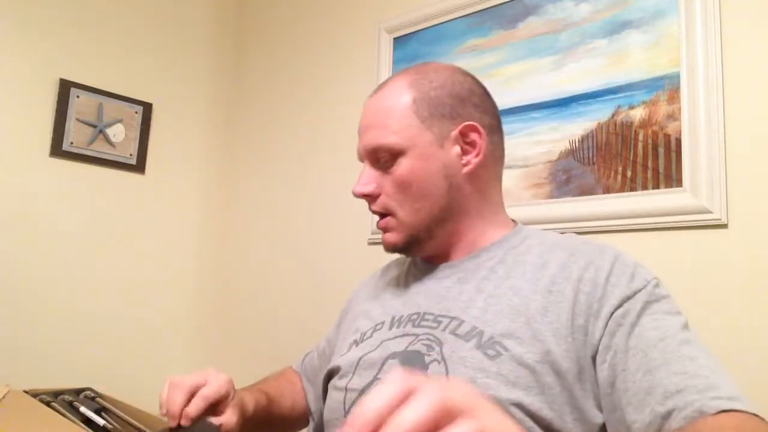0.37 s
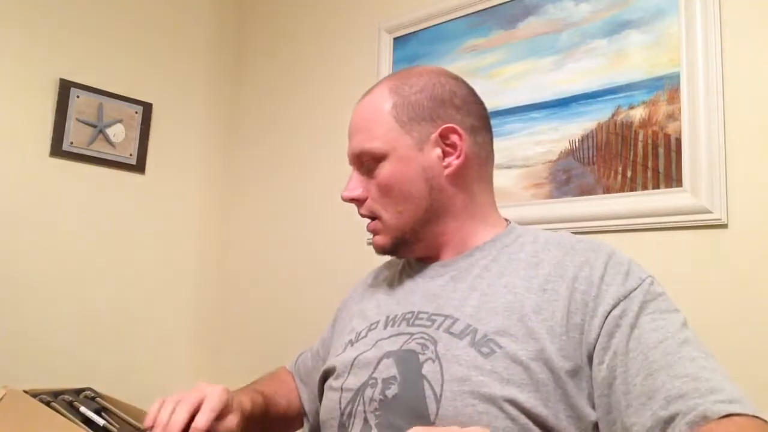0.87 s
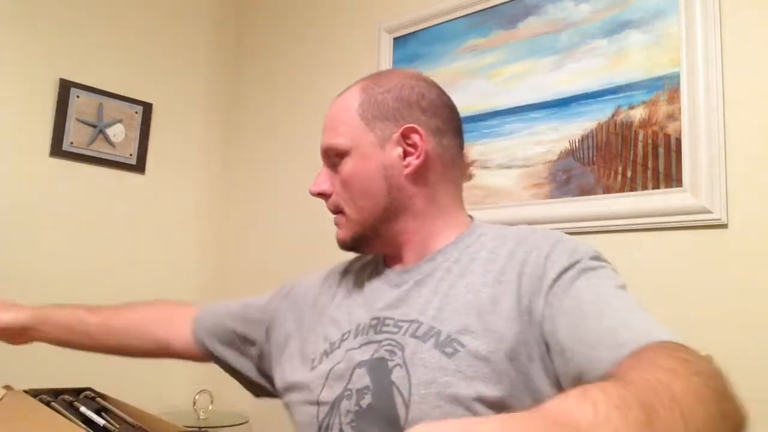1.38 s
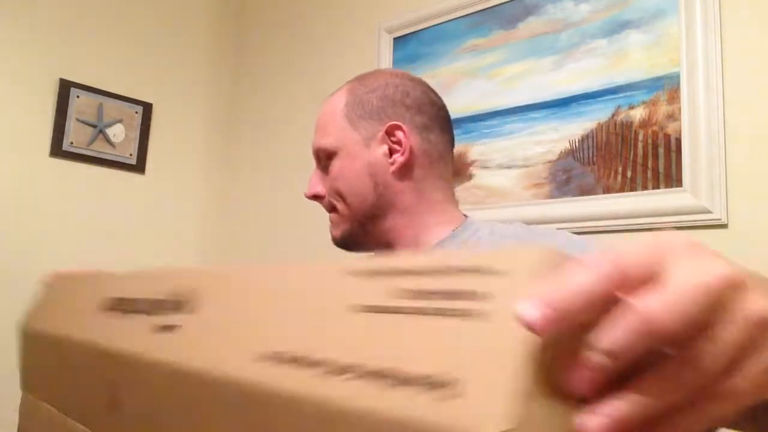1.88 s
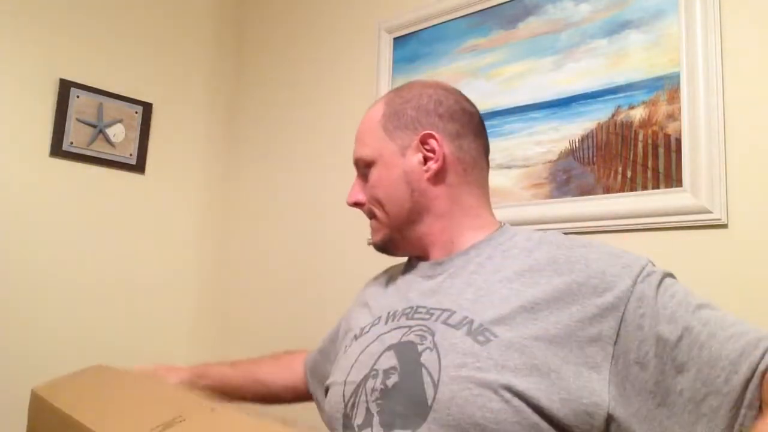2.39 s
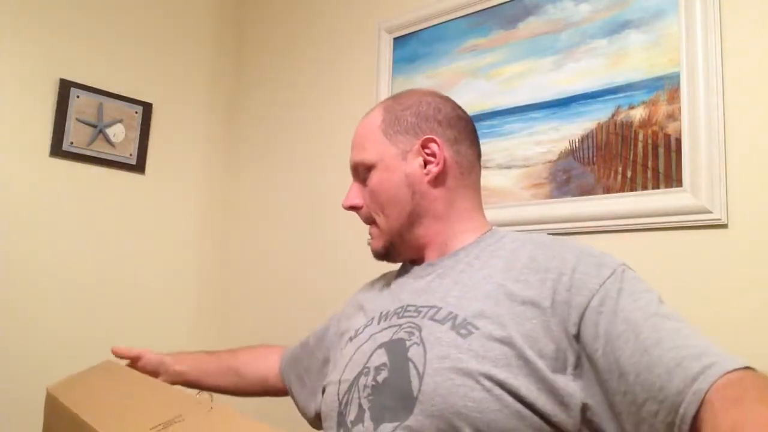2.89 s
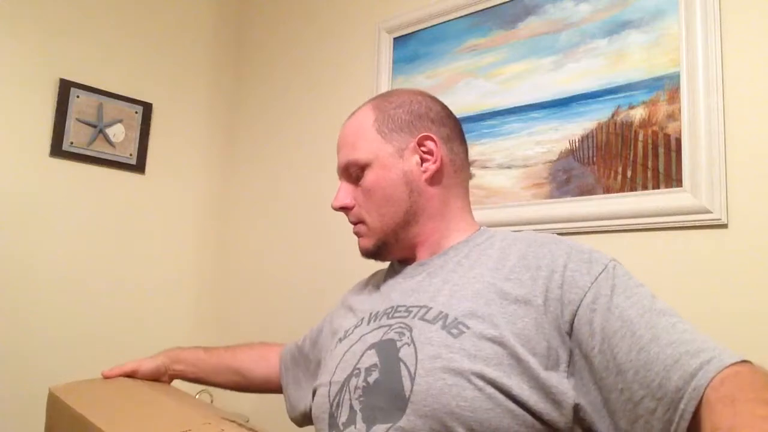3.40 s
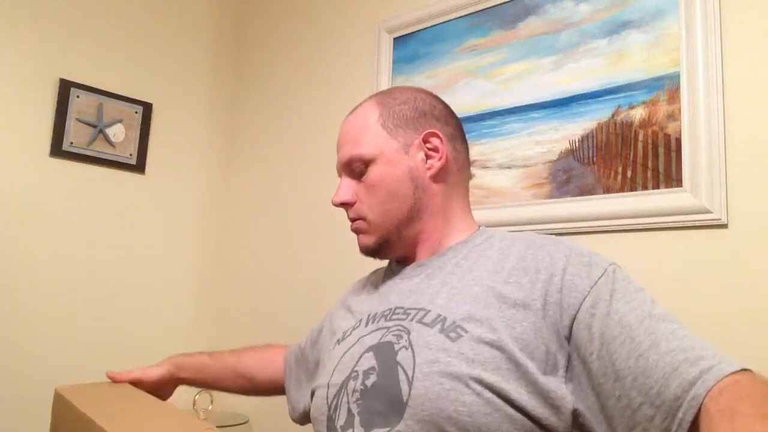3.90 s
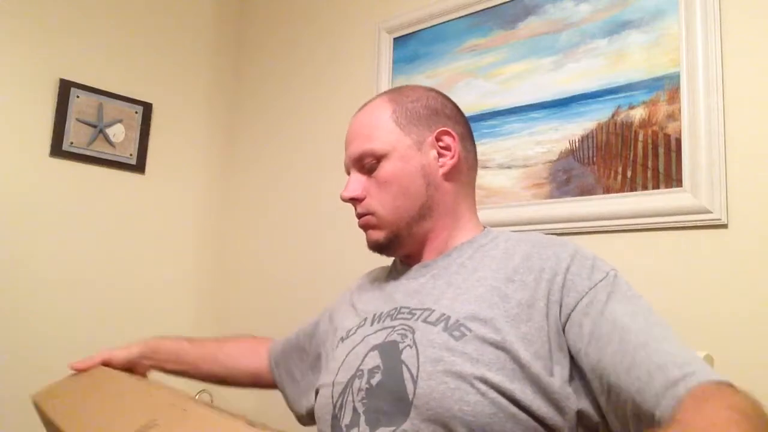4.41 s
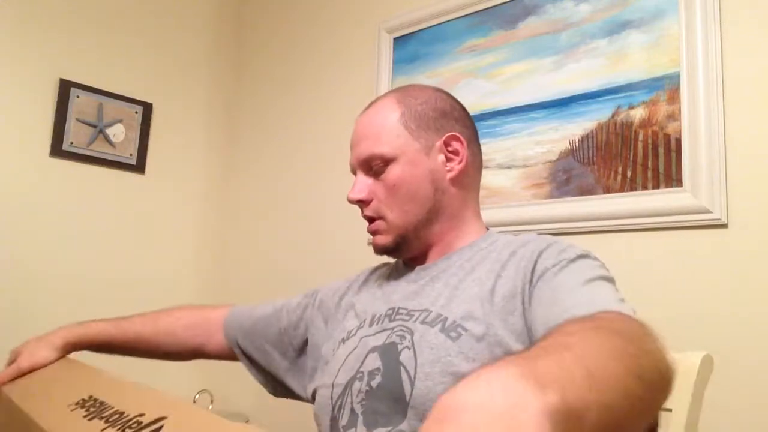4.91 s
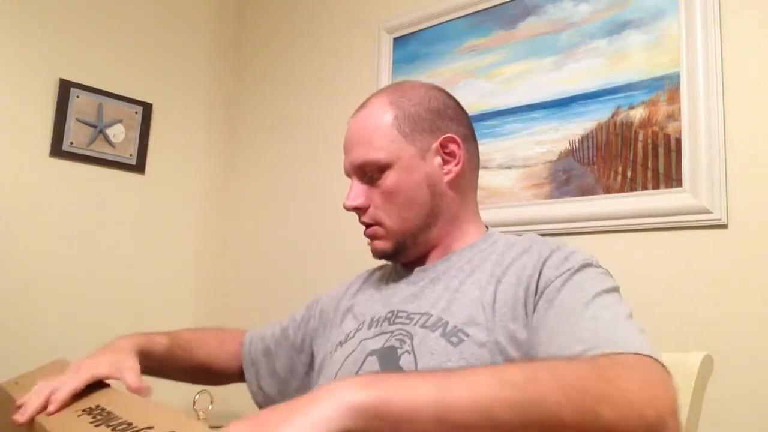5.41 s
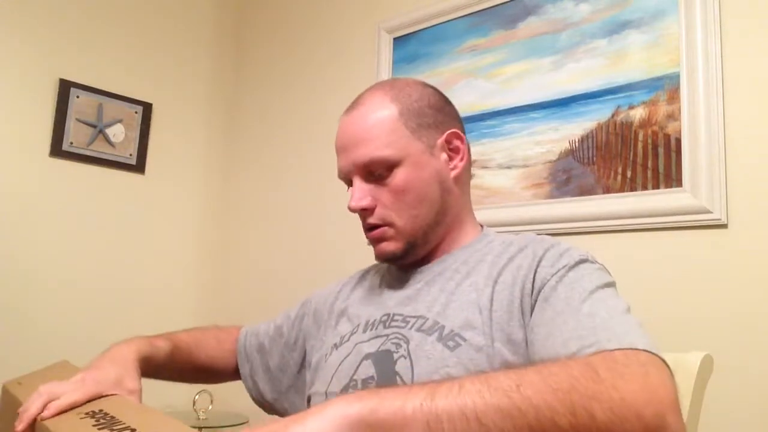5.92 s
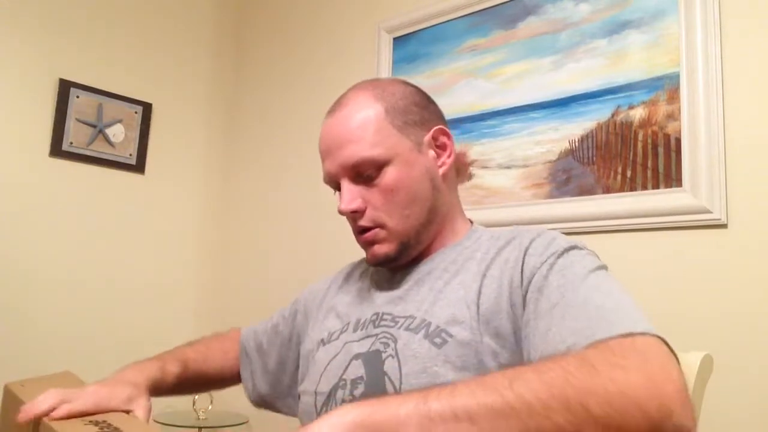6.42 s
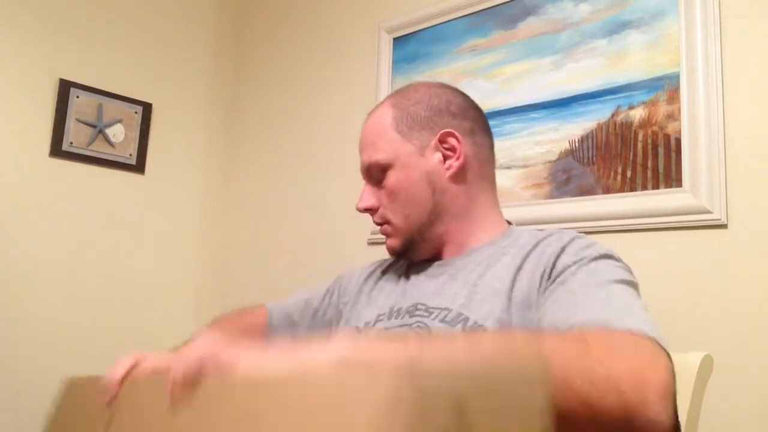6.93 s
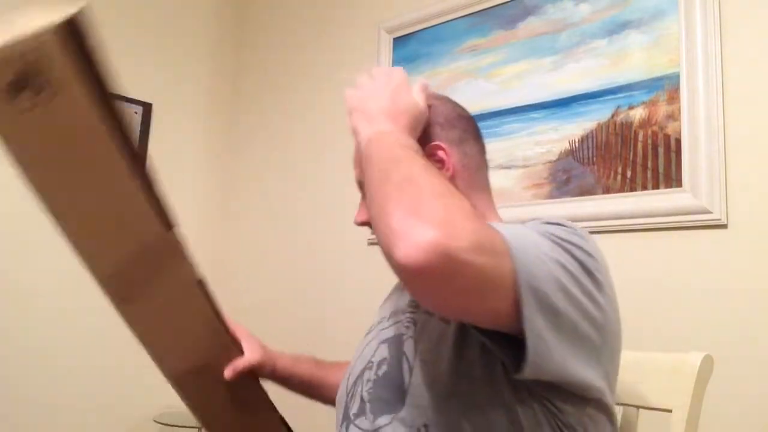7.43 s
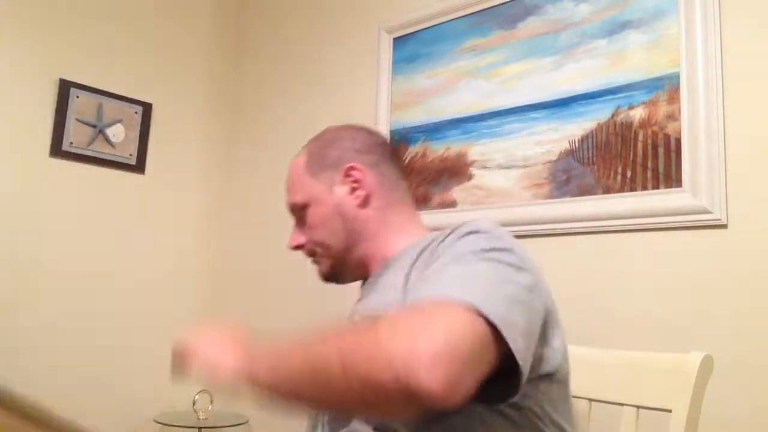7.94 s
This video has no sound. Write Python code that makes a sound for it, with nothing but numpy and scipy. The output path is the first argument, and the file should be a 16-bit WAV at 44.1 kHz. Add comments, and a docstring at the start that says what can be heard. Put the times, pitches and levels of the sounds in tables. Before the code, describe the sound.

A quiet furnished room with low, soft room tone; a long cardboard box is moved on a wooden table close to the microphone. For the first second only very faint rubbing, then a small tap and rasp at 1.0 s and a cluster of little clicks around 1.65 s. From 1.8 s dry papery sliding comes in strokes, with a short flap rasp and tiny squeak near 2.5 s. At 3.5 s a sharp, cracking hollow knock, then a crisp scrape at 3.85 s. Between 4.5 and 4.8 s low wavering creaks with light bumps; at 5.0 s a strong, duller boxy thud. Sliding continues, small bumps gather near 5.9 s, and at 6.3-6.5 s comes the loudest harsh, bright rasp with a knock. Then quieter: a brushing scrape at 7.25 s, light hollow taps from 7.4 to 7.95 s, fading to near stillness by 8 s.

```python
"""A long cardboard box is lifted, set down and pushed about on a wooden table in a quiet furnished room.
Sliding is random friction grit that hisses on the paper, scrapes the flutes (the wavy inner layer of the
cardboard) and shakes the panels and the table. Flaps jerk free in short rasps of the same kind of grit.
Knocks are clicks that ring panels and table and crack like snapping fibres. Now and then an edge sticks
and slips fast enough to creak, as wavering tones. Fading noise gives the echo, steady noise the room tone."""
import sys
import numpy as np
from scipy import signal
from scipy.fft import rfft, irfft
from scipy.io import wavfile

SR = 44100
rng = np.random.default_rng(int(sys.argv[2]) if len(sys.argv) > 2 else 0)


def nominal_scale(level):
    """Amplitude ratio for a level in decibels (scalar or array-like)."""
    x = np.asarray(level, float) / 20
    return 10 ** x


def wav_record(signal):
    """Record a signal, one row per channel, as 16-bit PCM in the file named by sys.argv[1]."""
    frames = np.transpose(np.atleast_2d(signal))
    bounded = np.clip(frames, -1, 1)
    # unit amplitude maps onto the largest positive 16-bit level
    quanta = np.round(bounded * 32767).astype(np.int16)
    wavfile.write(sys.argv[1], SR, quanta)


N = 356134

# ringing modes of the box panels: f/Hz, relative level/dB, time to die by 60 dB/s
PANEL_MODES = [(157, -13, 0.2), (203, -2, 0.16), (247.5, 0, 0.084), (300.8, 2.5, 0.053), (364.6, -2, 0.055),
               (407.2, 0, 0.057), (473.3, 2, 0.048), (545, 4, 0.031), (652, 3, 0.03), (746, 4.5, 0.02),
               (920, 4, 0.0085), (1031, -4, 0.042), (1234, 0, 0.015), (1435, 1, 0.013), (1660, 9.5, 0.0028),
               (1950, -4.5, 0.0055)]
# ringing modes of the table top: f/Hz, relative level/dB, time to die by 60 dB/s
TABLE_MODES = [(61, -5.5, 0.19), (84.4, 0.5, 0.17), (101.7, 2.5, 0.18), (151, -3, 0.22)]


def sliding():
    """Friction grit drives the paper, the flutes, the panels and the table."""
    # rubbing strokes: t/s of the fastest moment, rise/s, fall/s, paper hiss level/dB, lightness of touch/dB
    strokes = [(.3, 0.13, .15, -75.5, 0), (.58, 0.16, 0.27, -69.5, -1), (.76, 0.076, 0.093, -73, -8),
               (1.69, 0.11, .12, -60, -8), (1.848, 0.099, .09, -52.5, 2), (1.96, 0.14, 0.25, -62.5, -6.5),
               (2.12, 0.14, 0.5, -61, -11), (2.3, 0.17, 0.37, -53, 6), (2.589, 0.26, 0.066, -55, 7),
               (2.72, 0.42, 0.32, -58, 9), (2.86, 0.11, 0.28, -58, 5.5), (3.09, 0.16, 0.16, -49, 8),
               (3.16, 0.14, 0.24, -52, 7), (3.31, 0.077, 0.1, -48, 6), (3.46, 0.063, 0.28, -57, 3),
               (3.67, 0.12, 0.18, -56.5, 6.5), (3.93, 0.38, 0.2, -52.5, -6.5),
               (4.02, 0.087, 0.075, -47.5, -3), (4.16, 0.17, 0.093, -55.5, 4.5),
               (4.349, 0.17, 0.2, -55.5, 5), (4.42, 0.12, 0.45, -66.5, 4.5), (4.601, 0.34, 0.9, -63, -3.5),
               (4.97, 0.15, 0.18, -48.5, 4), (5.24, 0.24, 0.41, -54, 8.5), (5.378, 0.23, 0.32, -45.5, 5),
               (5.48, 0.6, 0.15, -52.5, 10), (5.71, 0.064, 0.22, -63.5, 0), (5.9, 0.044, .15, -66, -9),
               (5.929, 0.11, 0.1, -52, -5), (6.079, 0.14, 0.069, -58.5, -4), (6.2, 0.28, 0.33, -58.5, 4),
               (6.3, 0.18, .1, -50.5, -16), (6.369, 0.037, 0.28, -35.5, -6), (6.439, .05, .08, -35.5, -8.5),
               (6.52, 0.12, 0.22, -45, -7.5), (6.681, 0.44, 0.23, -52.5, 6), (6.8, 0.085, 0.11, -49, 6),
               (6.92, 0.11, 0.27, -64.5, -4.5), (7.25, 0.065, .07, -42.5, 7.5),
               (7.53, 0.36, 0.98, -72, -4.5)]
    # the hands' load on the box: t/s, panel shake level/dB, f/Hz of the rubbed spot
    load = [(0.0, -76.5, 346), (0.43, -71, 316), (0.61, -65, 487), (0.97, -73, 302), (1.01, -62, 550),
            (1.46, -83, 287), (1.91, -68.5, 298), (1.95, -58.5, 463), (2.51, -54.5, 254),
            (2.58, -52.5, 400), (2.94, -56, 297), (3.17, -53, 440), (3.53, -57, 310), (3.6, -46.5, 420),
            (3.71, -52.5, 325.4), (4.09, -60, 323), (4.2, -56.5, 445), (4.34, -57.5, 267),
            (4.61, -47.5, 420), (4.67, -42.5, 340), (4.76, -51, 600), (4.83, -58, 372), (5.1, -44.5, 286),
            (5.3, -61, 337), (5.35, -44.5, 540), (5.46, -59.5, 314), (5.87, -63, 347), (5.91, -55, 480),
            (5.97, -58, 396), (6.01, -60.5, 353), (6.14, -53.5, 373), (6.24, -51, 428), (6.33, -35.5, 507),
            (6.41, -32, 690), (6.49, -57, 340), (6.94, -60.5, 395), (7.6, -60, 302), (7.64, -64, 474),
            (8.07, -64, 358)]
    resting_hiss_db, light_spares = -81.5, 0.3   # a light touch spares the flutes this share of its dB
    *stroke, db, light_db = np.transpose(strokes)
    hiss_db = swells(*stroke, db, resting_hiss_db)
    top_db = swells(*stroke, db + light_db, resting_hiss_db)
    press_db = swells(*stroke, db - light_spares * light_db, resting_hiss_db)
    panel_db, spot_hz = in_time(load)
    box = paper_hiss(hiss_db, top_db) + flute_scrape(press_db, panel_db)
    return box + panel_shake(panel_db, spot_hz) + table_rumble(panel_db)


def paper_hiss(hiss_db, top_db, split_hz=8000):
    """Fine grit rubs the paper face; a lighter touch gives more of the highest treble."""
    # colour of rubbed paper: f/Hz, relative level per Hz/dB
    hiss_colour = [(1470, -19.5), (2500, -7), (2960, -5.5), (4200, -5.5), (7680, -9), (11700, -15),
                   (14600, -14.5), (15500, -15.5)]
    hiss = coloured(grit(15000, spread_db=2.5, lumpy_db=1.6), hiss_colour)
    top = filtered(hiss, 2, split_hz, "high")
    return nominal_scale(hiss_db) * (hiss - top) + nominal_scale(top_db) * top


def flute_scrape(press_db, panel_db):
    """Flutes sound by speed times load, and higher the harder they are scraped."""
    scrape_db, growth, flute_hz, db_per_octave = -57, 1.04, 1250, 38
    growth_db = growth * ((press_db + panel_db) / 2 - scrape_db)
    spot_hz = flute_hz * 2 ** (growth_db / db_per_octave)
    scrape = rubbed(grit(2500, spread_db=2.0, lumpy_db=0.0), flute_modes(), spot_hz, 0.8)
    return nominal_scale(scrape_db + growth_db) * scrape


def flute_modes():
    """The broad resonances of the flutes as quickly dying modes: a wider one dies sooner."""
    # resonances of the flutes: f/Hz, width/Hz, relative level/dB
    flutes = [(892, 870, 18), (1250, 533, 13), (1570, 195, 4), (1904, 390, 6), (2460, 580, 5)]
    return [(hz, db, np.log(1000) / (np.pi * width)) for hz, width, db in flutes]


def panel_shake(panel_db, spot_hz):
    """Lumpy grit shakes the panels, most near the pitch of the rubbed spot."""
    force = grit(1500, spread_db=3.5, lumpy_db=3.0)
    return nominal_scale(panel_db) * rubbed(force, PANEL_MODES[:12], spot_hz, 0.7)


def table_rumble(panel_db):
    """Sparse grit rumbles in the table top as the box leans on it and the hands load it."""
    # leans: t/s, rise/s, fall/s, rumble level/dB
    leans = [(.36, 0.26, 0.43, -67), (1.08, 0.2, 0.16, -52), (1.73, 0.2, 0.15, -52), (2.2, 0.12, 0.37, -59),
             (2.6, 0.27, 0.35, -64), (3.12, 0.077, 0.11, -56), (3.31, 0.076, 0.12, -58.5),
             (3.7, 0.31, 0.048, -51), (4.01, 0.13, 0.16, -50.5), (4.32, 0.11, 0.09, -49.5),
             (4.75, .15, 0.22, -57), (5.08, 0.14, 0.25, -45), (5.44, 0.087, 0.059, -49),
             (6.12, 0.32, 0.51, -50), (6.99, 1, 0.18, -68), (7.551, 0.23, 0.57, -66)]
    under_load_db = -23.5   # rumble relative to the panel shake
    weight = nominal_scale(swells(*np.transpose(leans), -90)) + nominal_scale(panel_db + under_load_db)
    return weight * rms_one(body(grit(450, spread_db=3.5, lumpy_db=4.0), TABLE_MODES))


def rasps():
    """A flap drags hard for a moment: quick rise, slower fall."""
    # flaps jerking free: start t/s, length scale/s, flute f/Hz, relative scrape level/dB, relative hiss level/dB
    jerks = [(1.02, 0.043, 2254, -54.5, -63), (1.55, .018, 2300, -87, -67.5),
             (1.655, 0.012, 2460, -57, -50), (1.7, 0.0098, 2300, -53.5, -67),
             (2.225, 0.055, 1570, -48, -84), (2.526, 0.062, 1500, -47, -50.5),
             (2.68, 0.024, 1600, -53.5, -63), (2.955, .012, 2300, -78, -47.5),
             (3.074, 0.032, 1800, -51, -47), (3.856, 0.043, 1210, -37, -33.5),
             (4.742, 0.031, 2266, -64, -55), (5.33, 0.1, 1900, -54, -65), (5.888, 0.026, 1200, -45, -62.5),
             (6.04, 0.027, 1570, -53.5, -64), (6.24, 0.22, 1900, -46.5, -66.5),
             (6.32, 0.18, 1950, -35, -35), (6.42, 0.027, 1950, -26, -18.5),
             (7.135, 0.052, 1250, -59, -65.5), (7.229, 0.057, 1500, -45.5, -45.5),
             (7.305, 0.029, 1570, -51.5, -49)]
    # hiss of a flap dragged hard: f/Hz, relative level per Hz/dB
    drag_colour = [(1470, -23), (2500, -8.5), (2760, -12), (3890, -12.5), (4470, -8.5), (6250, -4),
                   (9510, -13.5), (15500, -17.5)]
    shake_db = -6   # panels relative to the scrape
    t = np.arange(N) / SR
    swell = np.zeros((2, N))
    flute_hz = np.full(N, jerks[0][2], float)
    for s, length, hz, *levels_db in jerks:
        span = slice(int(s * SR), int((s + 3 * length) * SR))
        phase = np.abs(t[span] - s) / length * 3.3
        swell[:, span] += nominal_scale(levels_db)[:, None] * (phase * np.exp(1 - phase)) ** 1.34
        flute_hz[span] = hz
    force = grit(7000, spread_db=2.5, lumpy_db=2)
    scrape = rubbed(force, flute_modes(), flute_hz, 0.3)
    shake = nominal_scale(shake_db) * rms_one(body(force, PANEL_MODES[5:10]))
    return swell[0] * (scrape + shake) + swell[1] * coloured(force, drag_colour)


def knocks():
    """A blow rings the panels, cracks and thumps the table; returns the near sound and the feed to the echo."""
    # corner and hand knocks: t/s, relative panel level/dB, f/Hz of the struck spot,
    # relative crack level/dB, relative table thump level/dB
    blows = [(1.027, -38, 545, -61, -58), (1.037, -37, 600, -45.5, -56), (1.642, -66, 900, -41.5, -64),
             (1.648, -52, 151, -41, -49), (1.664, -61, 152, -37.5, -44), (1.686, -37, 251, -50, -50),
             (1.751, -50.5, 620, -50, -55), (2.467, -44, 250, -73, -77), (3.079, -45.5, 244, -44, -72),
             (3.491, -40, 278, -25, -65), (3.499, -33.5, 284, -34, -74), (3.528, -14.5, 278, -19, -35.5),
             (3.53, -31.5, 1070, -21, -62), (3.748, -43.5, 756, -47, -77), (3.858, -25.5, 266, -31, -70),
             (4.238, -49, 415, -45.5, -72), (4.313, -35, 256, -49, -69), (4.468, -33.5, 255, -61, -52),
             (4.522, -31.5, 366, -47, -43), (4.678, -35, 806, -71, -43.5), (4.711, -33.5, 590, -55, -60),
             (4.835, -34.5, 335, -66, -51), (5.009, -10.5, 310, -34.5, -55), (5.048, -33, 900, -68, -55),
             (5.024, -18, 303, -44, -29.5), (5.862, -42, 182, -80, -45.5), (5.896, -42, 448, -51, -61.5),
             (5.918, -34, 395, -67, -58), (5.928, -42, 446, -68, -66.5), (5.954, -38, 404, -62, -48.5),
             (5.968, -44.5, 302, -71.5, -60), (6.038, -35.5, 300, -54, -54),
             (6.073, -43.5, 263, -60.5, -59), (6.428, -22, 700, -42.5, -39), (6.443, -19, 309, -28, -34),
             (6.897, -53, 900, -52, -82), (7.047, -51.5, 800, -59.5, -79), (7.368, -45.5, 417, -57, -83),
             (7.471, -63, 407, -59, -68), (7.498, -54, 203.4, -58, -75), (7.546, -42, 293, -75, -75),
             (7.566, -56, 300, -64, -81), (7.676, -34, 1250, -48, -79), (7.677, -30.5, 510, -69, -74),
             (7.682, -34, 397, -70, -70), (7.769, -29.5, 527, -61, -55), (7.775, -36, 420, -64, -83),
             (7.893, -52, 450, -59.5, -68), (7.937, -46, 383, -62, -68)]
    # colour of the cracks: f/Hz, relative level per Hz/dB
    snap_colour = [(880, -43.5), (1500, -5.5), (2700, -8), (4230, -4), (6070, -7.5), (7670, -9),
                   (15500, -20)]
    # panel and table ringing goes into the echo more weakly, the snaps more strongly
    echo_ring_db, echo_snap_db = -5, 3
    s, panel_db, spot_hz, crack_db, thump_db = np.transpose(blows)
    at = (s * SR).astype(int)
    ringing = struck_panels(at, panel_db, spot_hz, crack_db) + table_thump(at, thump_db)
    snaps = clicks_at(at, nominal_scale(crack_db + 13.0))
    near = ringing + coloured(crack(snaps), snap_colour)
    # the echo is fed the plain coloured click of each crack, without the crumpling noise
    to_echo = nominal_scale(echo_ring_db) * ringing + nominal_scale(echo_snap_db) * coloured(snaps, snap_colour)
    return near, to_echo


def struck_panels(at, panel_db, spot_hz, crack_db, baffle_hz=130, give_cycles=6.4):
    """A blow rings the low modes near the struck spot's pitch; a hard one also the upper modes."""
    # upper modes lie between panel and crack, more for a high spot
    upper_db, hardness_share, high_spot_db_per_octave = -7.5, 0.33, 7.5
    upper_db = panel_db + upper_db + hardness_share * (crack_db - panel_db)
    upper_db += high_spot_db_per_octave * np.log2(spot_hz / PANEL_MODES[3][0])
    uneven_db = 2.0 * rng.standard_normal((len(at), len(PANEL_MODES)))
    out = np.zeros(N)
    for k, (hz, db, t60) in enumerate(PANEL_MODES):
        height = nominal_scale(db + uneven_db[:, k])
        low = clicks_at(at, nominal_scale(panel_db - 1) * nearness(hz, spot_hz, 0.42) * height)
        upper = clicks_at(at, (k > 6) * (-1) ** k * nominal_scale(upper_db) * height)
        # the soft wall gives way over a few cycles, so the low ring swells before it dies
        give = ring(low, hz, give_cycles / hz) * 2 * np.log(1000) * hz / (give_cycles * SR)
        sharp = filtered(upper + 1e-18, 1, hz / 2, "high")   # a hard edge has no low push
        out += ring(give + sharp, hz, t60)
    return filtered(out, 2, baffle_hz, "high")   # thin panels radiate no deep bass


def crack(snaps, crumple_s=0.0025, settle_s=0.038, settle_db=-26):
    """A snap, then noise of crumpling fibres, then fainter noise as the flaps rustle and settle."""
    fading = signal.lfilter([1], [1, -np.exp(-1 / (crumple_s * SR))], snaps)
    fading += nominal_scale(settle_db) * signal.lfilter([1], [1, -np.exp(-1 / (settle_s * SR))], snaps)
    return snaps + nominal_scale(-13) * fading * rng.standard_normal(N)


def table_thump(at, thump_db, push_hz=250):
    """The heavy table top gets only a soft push, which rings its modes."""
    push = filtered(clicks_at(at, nominal_scale(thump_db + 0.5)) + 1e-18, 2, push_hz, "low")
    return body(push, TABLE_MODES)


def creak(rasp_hz=2600):
    """An edge sticks and slips at a wavering rate: a tone with overtones, and a puff of noise per slip."""
    # one list for each creak: t/s, slip rate f/Hz, level/dB before the wavering
    slips = [
        [(2.527, 1480, -56), (2.535, 1670, -44), (2.552, 1330, -60), (2.57, 1630, -62), (2.71, 1600, -66.5)],
        [(3.775, 2500, -79.5), (3.785, 5400, -66), (3.797, 6200, -72)],
        [(4.52, 380, -41), (4.54, 470, -39), (4.555, 456, -37.5), (4.572, 304, -33.5), (4.603, 487, -32),
         (4.625, 420, -32.5), (4.645, 340, -42), (4.67, 780, -66)],
        [(4.685, 240, -43), (4.71, 290, -32.5), (4.713, 570, -36.5), (4.735, 620, -38.5), (4.752, 580, -40),
         (4.77, 680, -55)],
        [(4.762, 1260, -52), (4.785, 1255, -53), (4.835, 1330, -63)],
    ]
    # colour of each creak: fall of the overtones/dB, favoured f/Hz, its lift/dB, unevenness of grip/dB
    colours = [(-11, 3000, -1.5, 6.5), (-30, 5000, 9, 10), (-12.5, 910, 1.5, 2), (-13.5, 2800, 16.5, 3.5),
               (-9, 2500, -1, 0)]
    out, t = np.zeros(N), np.arange(N) / SR
    fibres = rms_one(filtered(rng.standard_normal(N), 2, [600, rasp_hz], "band"))
    for rows, (overtone_db, lift_hz, lift_db, grip_db) in zip(slips, colours):
        per_s, db = in_time(rows)
        phase = 2 * np.pi * np.cumsum(per_s * (1 + 0.033 * drift(120))) / SR
        tone = nominal_scale(-21) * fibres * (1 + np.sin(phase))
        for k in range(6):   # the slip rate itself, then five overtones
            hz = (k + 1) * per_s
            level_db = overtone_db * k ** 0.87 + lift_db * nearness(hz, lift_hz, 0.5)
            level_db = level_db + 2.5 * np.sqrt(k) * drift(26)
            tone += nominal_scale(level_db) * np.sin((k + 1) * phase) * (hz < 6000)
        gripping = nominal_scale(grip_db * drift(65))
        sounding = (t > rows[0][0]) * (t < rows[-1][0])
        out += np.sqrt(2) * tone * gripping * nominal_scale(db) * sounding
    return out


def room(x, first_s=0.0046, split_hz=3000, soft_hz=9000, bass_db=-4):
    """Dense echoes: noise that dies away, the treble sooner; soft furnishings take the top."""
    bass_t60_s, treble_t60_s = 0.63, 0.31   # time to die by 60 dB
    t, noise = np.arange(SR // 2) / SR, rng.standard_normal(SR // 2)
    bass = filtered(noise, 1, split_hz, "low")
    tail = bass * nominal_scale(bass_db - 60 * t / bass_t60_s) + (noise - bass) * nominal_scale(-60 * t / treble_t60_s)
    tail = filtered(tail * (t > first_s), 1, soft_hz, "low")
    return signal.oaconvolve(x, tail / np.sqrt(np.sum(tail[:SR // 10] ** 2)))[:N]


def room_tone():
    """The quiet air of the room: steady coloured noise."""
    # colour of the room tone: f/Hz, relative level per Hz/dB
    air_colour = [(18, -40.5), (30, -12), (173, 0.5), (307, -5), (709, -12.5), (787, -23.5), (1510, -13.5),
                  (2240, -24.5), (7650, -39.5), (15500, -39.5)]
    return nominal_scale(-67.5) * coloured(rng.standard_normal(N), air_colour)


def rms_one(x):
    """Scaled to an rms (average strength) of 1."""
    return x / np.sqrt(np.mean(x ** 2) + 1e-20)


def filtered(x, order, hz, kind):
    """Butterworth filter: keeps the part below, above or between the given frequencies."""
    return signal.sosfilt(signal.butter(order, hz, kind, fs=SR, output="sos"), x)


def in_time(rows):
    """Each column after the time as a straight-line curve over all samples."""
    s, *columns = np.transpose(rows)
    return [np.interp(np.arange(N) / SR, s, c) for c in columns]


def clicks_at(at, heights):
    """Silence with a one-sample click at each blow."""
    clicks = np.zeros(N)
    clicks[at] = heights
    return clicks


def coloured(x, spectrum):
    """Filter that follows the spectrum and answers at once (minimum phase); unit gain for white noise."""
    hz, db = np.transpose(spectrum)
    grid = np.maximum(np.arange(2049) * SR / 4096, 1)
    cepstrum = irfft(np.log(nominal_scale(np.interp(np.log(grid), np.log(hz), db))))
    # folding the second half onto the first puts the energy at the start
    cepstrum[1:2048] *= 2
    cepstrum[2049:] = 0
    kernel = irfft(np.exp(rfft(cepstrum)))
    return signal.oaconvolve(x, kernel / np.sqrt(np.sum(kernel ** 2)))[:N]


def drift(rate):
    """Slow random wander of spread 1: noise smoothed above the rate in Hz, one value per 40 samples."""
    r = np.exp(-80 * np.pi * rate / SR)
    slow = signal.lfilter([1], [1, -2 * r, r * r], rng.standard_normal(N // 40 + 2002))[2000:]
    return np.interp(np.arange(N) / 40, np.arange(len(slow)), rms_one(slow))


def grit(per_s, spread_db, lumpy_db):
    """Fibres catching: random clicks of uneven size, in lumps; rms 1."""
    sizes = nominal_scale(spread_db * np.minimum(rng.exponential(1, N), 4)) * rng.choice([-1, 1], N)
    catching = rng.random(N) < per_s / SR
    return rms_one(sizes * catching * nominal_scale(lumpy_db * drift(28)) + 1e-9)


def ring(force, hz, t60):
    """A unit click sets a dying sine of starting height 1 ringing."""
    r, w = nominal_scale(-60 / (t60 * SR)), 2 * np.pi * hz / SR
    return signal.lfilter([0, np.sin(w)], [1, -2 * r * np.cos(w), r * r], force + 1e-18)


def body(force, modes):
    """All modes of a body under one force, signs alternating."""
    return sum((-1) ** k * nominal_scale(db) * ring(force, hz, t60) for k, (hz, db, t60) in enumerate(modes))


def nearness(hz, spot_hz, reach_octaves):
    """A mode answers less the further its pitch lies from that of the touched spot."""
    return nominal_scale(-6 * (np.log2(hz / spot_hz) / reach_octaves) ** 2)


def rubbed(force, modes, spot_hz, reach_octaves):
    """Modes under a force that wanders over the body; loudness evened out."""
    near = [nominal_scale(db) * nearness(hz, spot_hz, reach_octaves) for hz, db, t60 in modes]
    power = sum(n ** 2 * t60 for n, (hz, db, t60) in zip(near, modes))
    even = force / np.sqrt(power)
    return rms_one(sum((-1) ** k * ring(even * near[k], hz, t60) for k, (hz, db, t60) in enumerate(modes)))


def swells(s, rise, fall, db, rest_db):
    """Level in dB of overlapping swells over a resting level."""
    drop_db, roundness = 28.5, 1.22   # a swell is this far down one rise before or one fall after its top
    t = np.arange(0, N + 64, 64) / SR
    lag = t - s[:, None]
    pace = np.where(lag < 0, rise[:, None], fall[:, None])
    down_db = drop_db * np.abs(lag / pace) ** roundness
    power = nominal_scale(rest_db) ** 2 + np.sum(nominal_scale(db[:, None] - down_db) ** 2, axis=0)
    return np.interp(np.arange(N) / SR, t, 10 * np.log10(power))


def scene():
    """The box heard directly, its echo and the room tone."""
    echo_db, creak_echo_db = -12, -4.5   # creaks go into the echo at a lower level
    rubbing = sliding() + rasps()
    near, to_echo = knocks()
    creaking = creak()
    echo = nominal_scale(echo_db) * room(rubbing + to_echo + nominal_scale(creak_echo_db) * creaking)
    return (rubbing + near + creaking + echo + room_tone())[None]


def low_pass(x):
    """Removes everything above the highest recorded frequency."""
    return signal.sosfilt(signal.butter(12, 16370, fs=SR, output="sos"), x)


def record(dry):
    """The deepest bass and everything above about 15.9 kHz are filtered away."""
    no_top = signal.sosfilt(signal.cheby2(10, 50, 15900, fs=SR, output="sos"), dry)
    mix = filtered(no_top, 2, 35, "high")
    return low_pass(mix)


dry = scene()
out = record(dry)
wav_record(out)
```